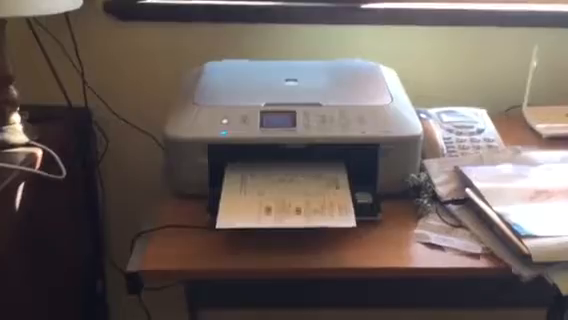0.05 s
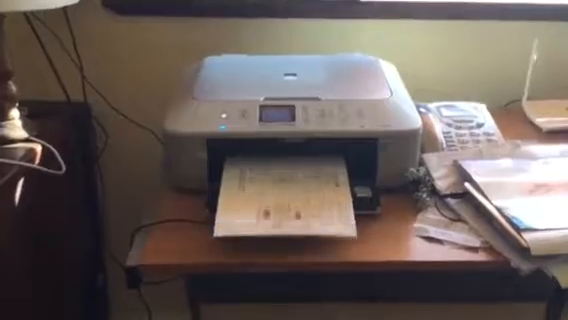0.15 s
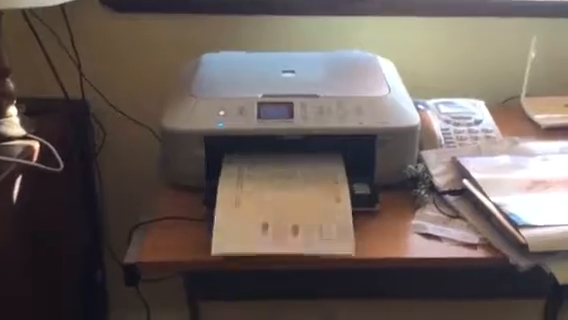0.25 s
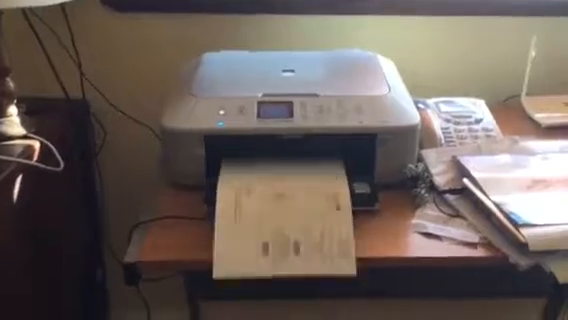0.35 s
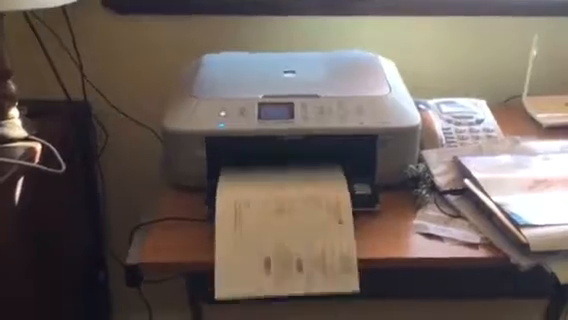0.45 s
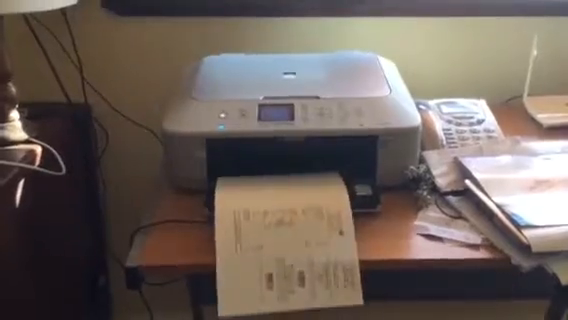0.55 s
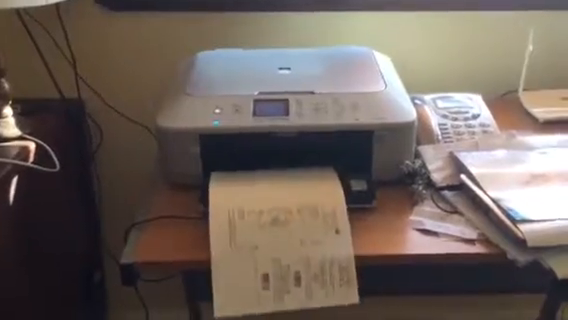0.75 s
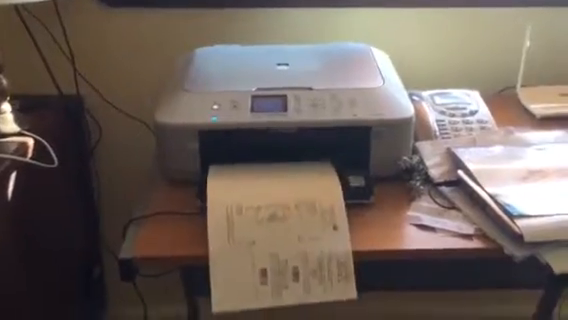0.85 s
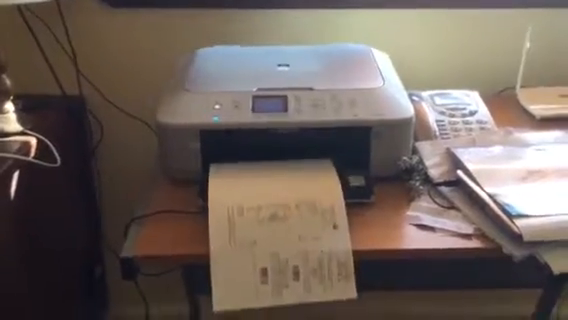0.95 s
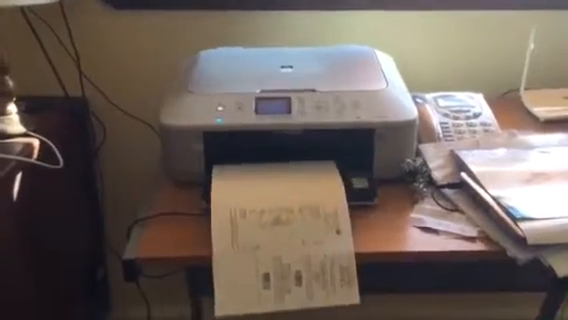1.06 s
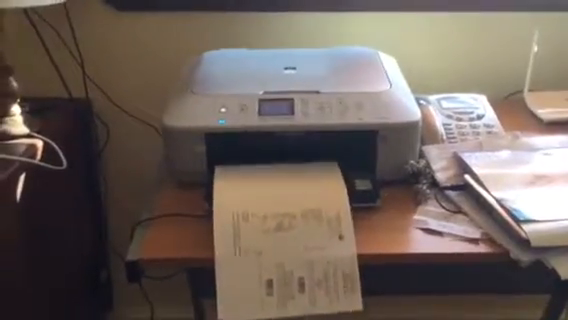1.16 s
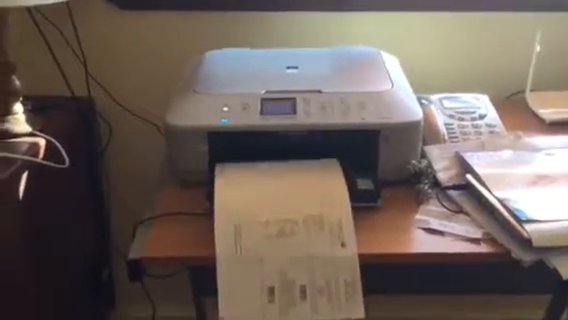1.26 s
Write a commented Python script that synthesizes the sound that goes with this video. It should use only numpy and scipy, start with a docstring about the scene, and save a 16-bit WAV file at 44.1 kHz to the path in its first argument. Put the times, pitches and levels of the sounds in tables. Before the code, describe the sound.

A desktop printer whirs briefly, clunks, then hums quietly as a sheet slides out.

```python
"""The feed motor of a desktop inkjet printer whines through its gears for half a second and runs down.
Its tones are multiples of the shaft rate, over gear rattle and brush hiss. A paper rustle, a soft thump
and a click lead in; a sinking groan, a second thump and the clunk of a latch, which rings the plastic
housing, end the feed. Then a slow drive hums while the sheet slides over the desk edge with a soft,
growing hiss. The impacts reverberate in a small room."""
import sys
import numpy as np
from scipy import signal
from scipy.fft import rfft, irfft, next_fast_len
from scipy.io import wavfile
from scipy.ndimage import map_coordinates

SR = 44100
rng = np.random.default_rng(int(sys.argv[2]) if len(sys.argv) > 2 else 0)


def generate_wav(sig):
    """Save sig (samples, or channels by samples) to the path in sys.argv[1] as 16-bit PCM at SR."""
    pcm = np.round(np.clip(np.atleast_2d(sig).T, -1, 1) * 32767).astype(np.int16)
    wavfile.write(sys.argv[1], SR, pcm)


N = 57330

# Shaft rotation rate: t/s, f/Hz
SHAFT_RATE = [(.2, 70), (.225, 72), (.25, 73.3), (.29, 74.8), (.36, 75.0), (.55, 75.0), (.62, 75.0),
              (.7, 74.8), (.78, 73)]
# Load on the feed drive: t/s, level/dB
FEED_LOAD = [(.19, -73), (.215, -8), (.25, -3.5), (.32, -1.5), (.43, -1), (.575, -1.63), (.605, -6),
             (.69, -8), (.76, -23), (.8, -72)]
def feed_motor(flutter=0.001):
    """Rotating machinery: one shaft sets every pitch; orders, chafe and hiss grow faster than the load."""
    turns = np.cumsum(curve(SHAFT_RATE) * (1 + flutter * wobble(61))) / SR
    load = amp(curve(FEED_LOAD))
    return (gear_whine(turns) + cogging_drone(turns)
            + load ** 1.5 * shaft_orders(turns)
            + load * other_gears(turns)
            + load ** 3.5 * chafe(turns)
            + load * gear_rattle(turns)
            + load ** 1.6 * brush_hiss())


# Whine envelope: t/s, level/dB
WHINE_LEVEL = [(.22, -99), (.25, -41.5), (.277, -61), (.295, -42), (.355, -39), (.53, -38.5), (.59, -43.5),
               (.615, -53), (.7, -53.5), (.75, -67), (.8, -120)]
def gear_whine(turns, teeth=16, runout_cycles=0.03):
    """Gear meshing: a tone at the tooth rate, phase-modulated once a turn by the off-centre gear."""
    runout = runout_cycles * np.sin(2 * np.pi * turns)
    return amp(curve(WHINE_LEVEL)) * tone(teeth * turns + runout)


# Drone envelope: t/s, level/dB
DRONE_LEVEL = [(.2, -100), (.218, -51.5), (.248, -41.5), (.267, -52.5), (.285, -42), (.305, -60.5),
               (.322, -46), (.372, -76), (.395, -47), (.432, -45), (.475, -66), (.503, -46.5), (.54, -49),
               (.6, -70), (.66, -46.5), (.69, -57.5), (.8, -110)]
def cogging_drone(turns, poles=4):
    """Cogging: the torque pulses as each pole passes, giving a rough, low tone."""
    return amp(curve(DRONE_LEVEL) + 2 * wobble(130)) * tone(poles * turns + 0.057 * wobble(90.2))


# Weaker partials at full load: multiple of the shaft rate, level/dB
SHAFT_ORDERS = [(3, -64), (8, -63.5), (9, -73.5), (10, -53), (11, -65.5), (15, -58), (20, -75), (24, -62.5),
                (26, -64), (27, -58.5), (33, -68), (45, -68), (58, -69)]
def shaft_orders(turns):
    """Harmonic series: vibration that repeats each turn sounds at whole multiples of the shaft rate."""
    return sum(amp(db + 3 * wobble(30.17)) * tone(order * turns + 0.086 * wobble(49.86))
               for order, db in SHAFT_ORDERS)


# Gear tones at full speed and load: f/Hz, level/dB
GEAR_TONES = [(192, -66.5), (325, -56), (570, -65.5), (645, -71), (799, -65.5), (1135, -54)]
def other_gears(turns, full_speed_hz=75, play_cycles=0.2):
    """Backlash: play in the other gears jitters the phase of their tones and roughens them."""
    return sum(amp(db + 2 * wobble(41.5)) * tone(hz / full_speed_hz * turns + play_cycles * wobble(44.7))
               for hz, db in GEAR_TONES)


def chafe(turns, order=30, peakiness=1.3, sweep_cycles=0.2):
    """Periodic friction: a rubbing tone swells and bends in pitch once a turn."""
    swing = np.cos(2 * np.pi * turns)
    envelope = amp(-44 + 0.51 * wobble(70)) * np.exp(peakiness * (swing - 1))
    return envelope * tone(order * turns + sweep_cycles * swing)


# Rattle spectrum: f/Hz, relative level/dB
RATTLE_SPECTRUM = [(40, -46), (120, -27), (190, -7), (300, -1), (430, -4.5), (650, -2), (920, -6.5),
                   (1250, -1.5), (1700, -8), (2300, -4.5), (2800, -13), (3800, -10), (5500, -17.5),
                   (8000, -27), (15000, -55)]
def gear_rattle(turns):
    """Amplitude modulation: the gears' grainy noise pulses slightly with each turn."""
    rattle = case_reflections(noise(RATTLE_SPECTRUM), strength=0.2)
    flicker_db = 0.3 * np.cos(2 * np.pi * turns) + 0.75 * wobble(700)
    return amp(-47) * unit(rattle * amp(flicker_db))


# Brush spectrum: f/Hz, relative level/dB
BRUSH_SPECTRUM = [(1500, -5), (4000, -9), (7000, -4.5), (9500, 2.5), (13500, 3), (14500, -3.5),
                  (16000, -44)]
def brush_hiss():
    """Sliding contact: the motor's brushes make a bright, finely grained hiss."""
    hiss = case_reflections(noise(BRUSH_SPECTRUM), strength=0.15, count=22)
    flicker_db = 0.5 * wobble(1100) + 0.37 * wobble(38.7)
    return amp(-54) * unit(hiss * amp(flicker_db))


def start_click():
    """Impulsive excitation: the motor starts with a click, brief and therefore broad in spectrum."""
    bright = noise([(500, 4), (2500, 3.5), (5000, 1), (12500, 2), (15500, -7)])
    return amp(-44.5) * blow(0.2025, attack=0.0003, t60=0.042) * bright


# First touch, catch and rebounds of the latch: t/s, level/dB
LATCH_BLOWS = [(0.7005, -54.5), (0.7068, -42.5), (0.723, -52), (0.746, -62)]
# Modes of the plastic housing: f/Hz, level/dB re the blow, T60/s
HOUSING_MODES = [(293.2, -9, 0.13), (1532, -18, 0.13), (1720, -12, 0.12), (2007, -3.5, 0.093),
                 (2355, -7.5, 0.14)]
# Spectra of the short knock and the longer clatter: f/Hz, relative level/dB
KNOCK_SPECTRUM = [(300, -47), (1150, -14), (1450, -3), (1750, -1), (2050, -1), (2350, -13), (4200, -17),
                  (5500, -24), (12000, -28.5), (15000, -65)]
CLATTER_SPECTRUM = [(30, -18), (75, -3), (130, 2.5), (200, 5), (310, 1.5), (430, 1), (600, -1), (950, -3),
                    (1600, 1.5), (2100, -5.5), (2700, -5.5), (3800, -5.5), (5000, -17.5), (8000, -23.5),
                    (13000, -43), (15500, -52)]
def latch(rise_s=0.006):
    """Modal ringing: each blow knocks, clatters, excites the housing's damped modes and shakes the desk."""
    out = np.zeros(N)
    for start, db in LATCH_BLOWS:
        ring = sum(amp(level) * blow(start, rise_s, t60) * tone(hz * clock())
                   for hz, level, t60 in HOUSING_MODES)
        knock = amp(9) * blow(start, rise_s, t60=0.047) * noise(KNOCK_SPECTRUM)
        clatter = amp(-1) * blow(start, 2 * rise_s, t60=0.31) * noise(CLATTER_SPECTRUM)
        out += amp(db) * (ring + knock + clatter + amp(-18) * desk(start, attack=0.018))
    return out


def latch_spring(hz=3310):
    """Free vibration: a small spring rings on thinly after the first latch blow."""
    envelope = amp(-57 + 0.62 * wobble(58.8)) * blow(LATCH_BLOWS[0][0], attack=0.006, t60=0.5)
    return envelope * tone(hz * clock() + 0.2 * wobble(90))


# Soft knocks of the mechanism: t/s, level/dB, T60/s
SOFT_KNOCKS = [(.112, -44.5, 0.098), (0.653, -44.5, 0.13)]
# Their spectrum: f/Hz, relative level/dB
THUMP_SPECTRUM = [(25, -37), (60, -1), (100, -13), (190, 7.5), (245, 1), (295, -9), (380, -1), (650, -8.5),
                  (1200, -16.5), (4000, -20), (12000, -68)]
def thumps():
    """Soft impact: a dull knock makes the housing boom in its lowest mode and shakes the desk."""
    out = np.zeros(N)
    for start, db, t60 in SOFT_KNOCKS:
        thud = 0.93 * noise(THUMP_SPECTRUM)
        boom = amp(-3.5) * tone(HOUSING_MODES[0][0] * clock())
        body = blow(start, 0.0033, t60) * (thud + boom)
        out += amp(db) * (body + amp(-14) * desk(start, attack=0.024))
    return out


# Response of the desk: f/Hz, relative level/dB
DESK_SPECTRUM = [(25, -30), (38, -3), (50, -2), (68, 10), (100, 4), (140, 11), (250, -35)]
def desk(start, attack):
    """Structure-borne sound: the desk answers a knock with a brief, low rumble."""
    return blow(start, attack, t60=0.25) * noise(DESK_SPECTRUM)


# Path of the groan: t/s, f/Hz, level/dB
GROAN_GLIDE = [(.5, 198.8, -72), (.55, 194, -56), (.6, 179.8, -73), (0.656, 130.8, -65.5), (.69, 120, -80)]
def roller_groan():
    """Frequency glide: a rough, low tone sinks as the rollers unload."""
    times, hz, db = np.transpose(GROAN_GLIDE)
    level = np.interp(clock(), times, db, left=-120, right=-120)
    cycles = np.cumsum(np.interp(clock(), times, hz)) / SR
    return amp(level + 3.8 * wobble(68.9)) * tone(cycles + 0.097 * wobble(70.03))


# Rustle envelope: t/s, level/dB
RUSTLE_LEVEL = [(0, -57), (.06, -59.5), (.1, -60.5), (.17, -62), (.21, -58), (.3, -61.5), (.4, -120)]
# Rustle spectrum: f/Hz, relative level/dB
RUSTLE_SPECTRUM = [(150, 4), (600, 4), (1100, 2), (2200, 0), (2900, -4), (3400, 2.5), (3900, 2.5),
                   (4900, 2.5), (5400, 1.5), (5900, 1), (7500, -7.5), (13000, -9), (15500, -20)]
# Roller squeaks: f/Hz, level/dB re the rustle
ROLLER_SQUEAKS = [(1530, -23), (2200, -13), (2765, -17), (3380, -16.5), (5330, -15), (5470, -20)]
def paper_rustle():
    """Friction: paper in the rollers gives grainy noise and thin, wavering squeaks."""
    squeaks = sum(amp(db + 6.7 * wobble(63.8)) * tone(hz * clock() + 0.18 * wobble(120.7))
                  for hz, db in ROLLER_SQUEAKS)
    grain = amp(2.3 * wobble(119) + 1.3 * wobble(1100))
    rustle = grain * case_reflections(noise(RUSTLE_SPECTRUM), strength=0.26)
    return amp(curve(RUSTLE_LEVEL)) * (rustle + squeaks)


# Envelopes of the hum and the hiss: t/s, level/dB
HUM_LEVEL = [(.7, -103), (.82, -64), (.91, -67), (1.0, -60.5), (1.11, -59), (1.18, -61.5), (1.3, -61.5)]
HISS_LEVEL = [(.7, -72), (.83, -64), (1.02, -64.5), (1.1, -61), (1.2, -60.5), (1.27, -57), (1.3, -59)]
# Hum partials and hiss spectrum: f/Hz, relative level/dB
HUM_PARTIALS = [(239.3, 1), (298.5, -1), (376, -14.5), (479.5, -14.5), (539, -18.5), (720.5, -18)]
HISS_SPECTRUM = [(500, -12), (1800, -6), (3000, 2.5), (4500, 0), (5600, -2), (7200, -2), (9000, 1),
                 (10400, 2.5), (11600, 4), (14000, 3.5), (15500, -8)]
def slow_drive():
    """Beating: two low partials interfere beneath weak overtones, while a hiss swells with them."""
    hum = sum(amp(db + 1.36 * wobble(12)) * tone(hz * clock() + 0.11 * wobble(26.9))
              for hz, db in HUM_PARTIALS)
    hiss_db = curve(HISS_LEVEL) + 0.53 * wobble(340) + 1.1 * wobble(35)
    hiss = case_reflections(noise(HISS_SPECTRUM), strength=0.15)
    return amp(curve(HUM_LEVEL)) * hum + amp(hiss_db) * hiss


# Scuff spectrum: f/Hz, relative level/dB
SCUFF_SPECTRUM = [(100, -38), (300, -14), (800, 6), (1200, 17), (1900, 3), (3200, -20), (6000, -34),
                  (12000, -50)]
def sheet_scuff(peak_s=0.97, width_s=0.051):
    """Grazing contact: the sheet sags over the desk with one faint swell of noise."""
    swell = np.exp(-0.5 * ((clock() - peak_s) / width_s) ** 2)
    return amp(-63.5) * swell * noise(SCUFF_SPECTRUM)


# Strokes of the sheet: onset t/s, duration/s, level/dB
SHEET_STROKES = [(1.04, .135, -69), (1.22, .12, -72.5)]
# Their spectrum: f/Hz, relative level/dB
SLIDE_SPECTRUM = [(1500, -8), (3000, -2), (4400, -5), (5400, 8.5), (6400, 2), (7500, -7), (8900, 6),
                  (10500, -7), (15000, -8)]
def sheet_sliding(fade_s=0.023):
    """Sliding friction: the hanging sheet brushes over the desk edge in soft swishes."""
    t = clock()
    contact = sum(amp(db) * np.clip(np.minimum(t - start, start + length - t) / fade_s, 0, 1)
                  for start, length, db in SHEET_STROKES)
    grain = amp(1.6 * wobble(44.4) + 1.6 * wobble(550))
    return contact * grain * noise(SLIDE_SPECTRUM)


def case_reflections(x, strength, count=7):
    """Comb filtering: echoes within 10 ms inside the plastic case colour the sound; the result has rms 1."""
    taps = np.zeros(SR // 100)
    taps[rng.integers(SR // 2000, len(taps), count)] = strength * rng.choice([-1, 1], count)
    taps[0] = 1
    return unit(signal.fftconvolve(x, taps)[:N])


def room_reverb(x):
    """Reverberation: dense wall reflections form an exponentially decaying tail, half a second long."""
    reflections = noise([(100, 1.5), (3500, 1.5), (12000, 0)])
    tail = (reflections * blow(0.014, attack=0.0038, t60=0.92))[:SR // 2]
    return signal.fftconvolve(x, tail / np.linalg.norm(tail))[:N]


# Background spectrum: f/Hz, relative level/dB
AMBIENT_SPECTRUM = [(20, -34), (40, -19), (65, -0.5), (130, 1.5), (280, 11.5), (450, 0), (1200, -0.5),
                    (2500, -3), (5000, -18.5), (8000, -38), (12000, -8), (15500, -43)]
def room_noise():
    """Stationary noise: the quiet, steady background of the room."""
    return amp(-62) * noise(AMBIENT_SPECTRUM)


def amp(db):
    """Decibels to amplitude ratio."""
    return 10 ** (np.asarray(db) / 20)


def unit(x):
    """Normalisation to rms 1."""
    return x / np.sqrt(np.mean(x ** 2) + 1e-20)


def clock():
    """Sample times in seconds."""
    return np.arange(N) / SR


def curve(rows):
    """Linear interpolation of (t/s, value) rows at every sample."""
    return np.interp(clock(), *np.transpose(rows))


def wobble(rate):
    """Random modulation: a smooth curve through `rate` Gaussian values a second."""
    return map_coordinates(rng.standard_normal(2048), [clock() * rate + 2], mode="wrap")


def noise(spectrum):
    """Spectral shaping: noise of rms 1, coloured by (f/Hz, level/dB) rows of spectral density."""
    size = next_fast_len(N + 8192)
    hz, db = np.transpose(spectrum)
    gain = amp(np.interp(np.log(np.fft.rfftfreq(size, 1 / SR) + 1), np.log(hz), db))
    return unit(irfft(rfft(rng.standard_normal(size)) * gain, size)[:N])


def tone(cycles):
    """A sinusoid of rms 1 and random starting phase that follows a running count of cycles."""
    return np.sqrt(2) * np.sin(2 * np.pi * (cycles + rng.random()))


def blow(start, attack, t60):
    """Damping: an impact's envelope rises quickly, then falls 60 dB every t60 seconds."""
    age = np.maximum(clock() - start, 0)
    return (1 - np.exp(-age / attack)) * amp(-60 * age / t60)


def scene():
    """Superposition: drives, paper, impacts and room add in one channel; only the impacts reverberate."""
    impacts = start_click() + thumps() + latch()
    drives = feed_motor() + roller_groan() + slow_drive()
    paper = paper_rustle() + sheet_scuff() + sheet_sliding()
    room = amp(-7.5) * room_reverb(impacts) + room_noise()
    return (drives + impacts + latch_spring() + paper + room)[None]


def record(dry, low_cut_hz=23, top_hz=15550):
    """Band limiting: the microphone loses the deepest bass, and nothing passes above top_hz."""
    size = next_fast_len(N + 8192)
    hz = np.fft.rfftfreq(size, 1 / SR)
    high_pass = 1 - 1 / (1 + (hz / low_cut_hz) ** 4)
    return irfft(rfft(dry, size) * high_pass * (hz < top_hz), size)[..., :N]


dry = scene()
out = record(dry)
generate_wav(out)
```